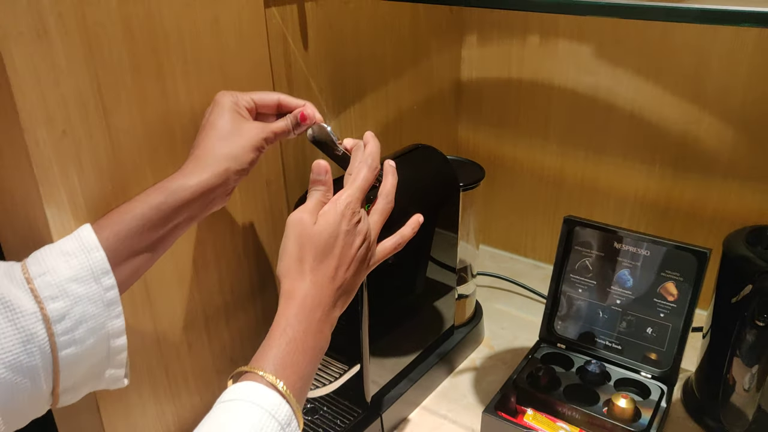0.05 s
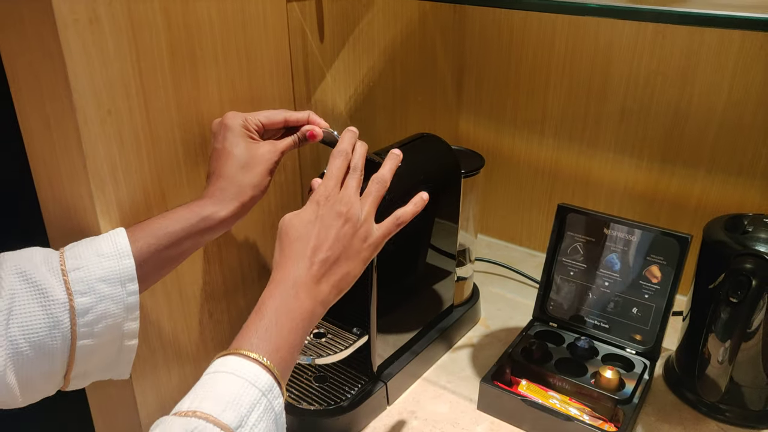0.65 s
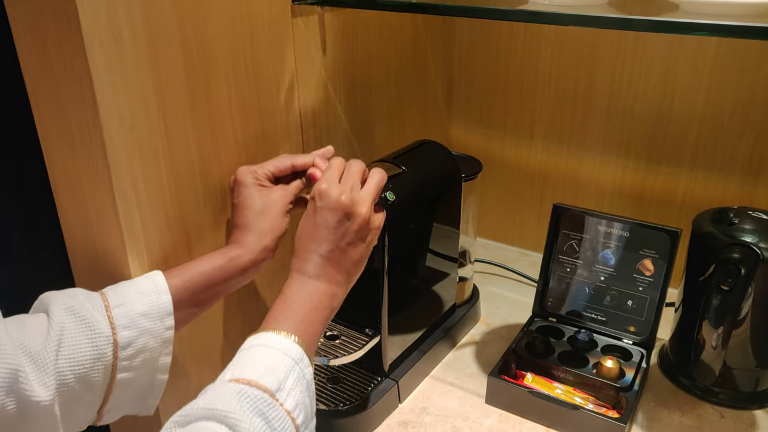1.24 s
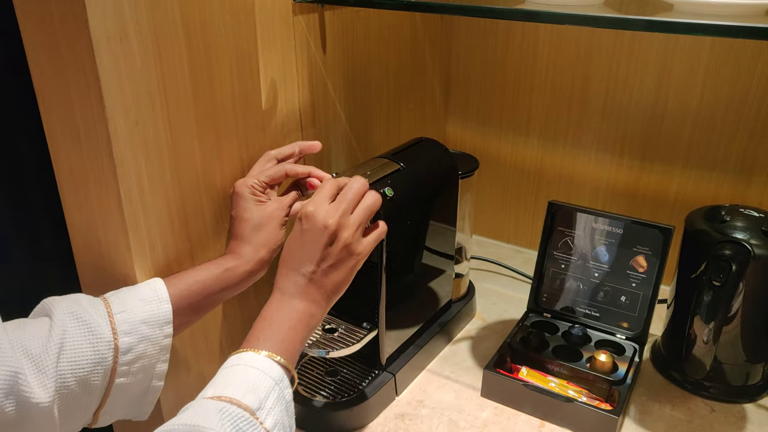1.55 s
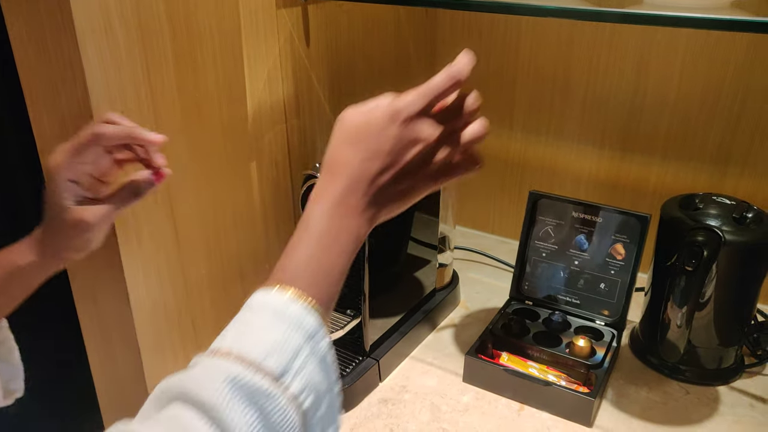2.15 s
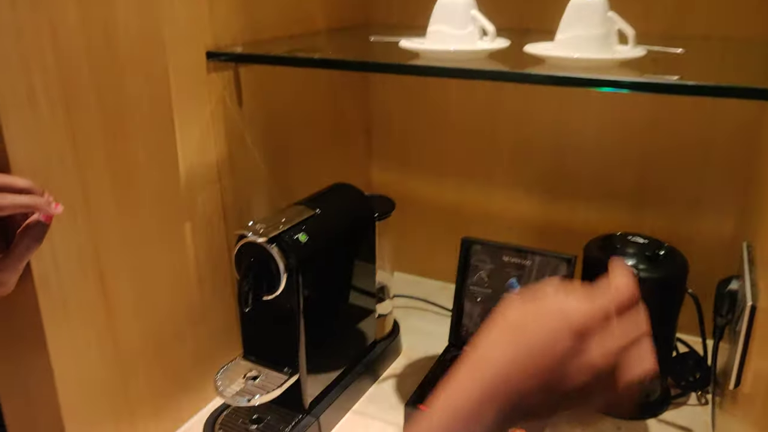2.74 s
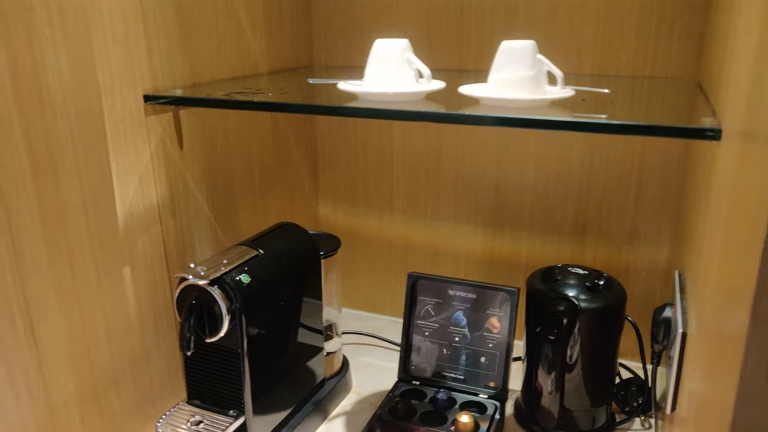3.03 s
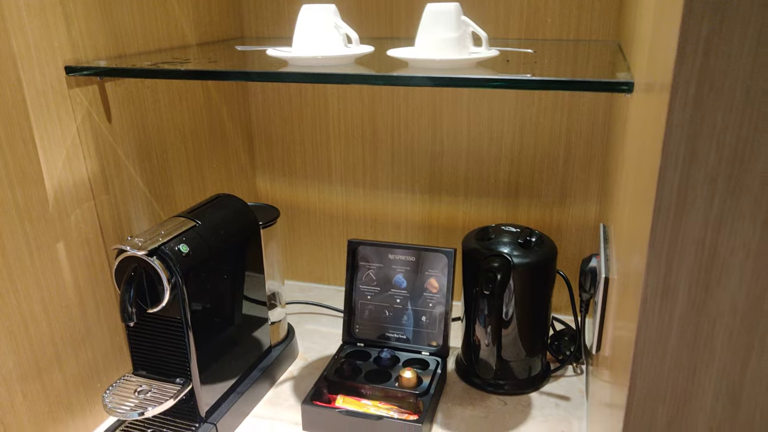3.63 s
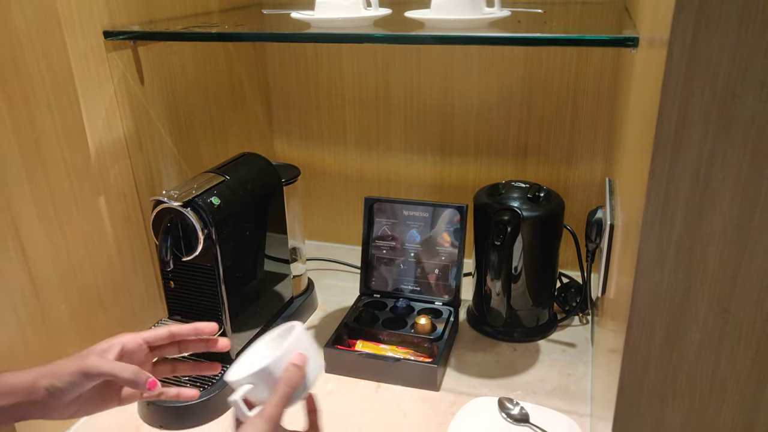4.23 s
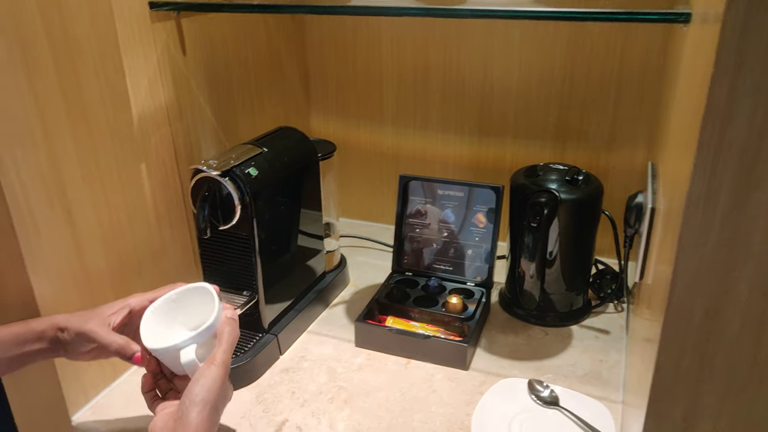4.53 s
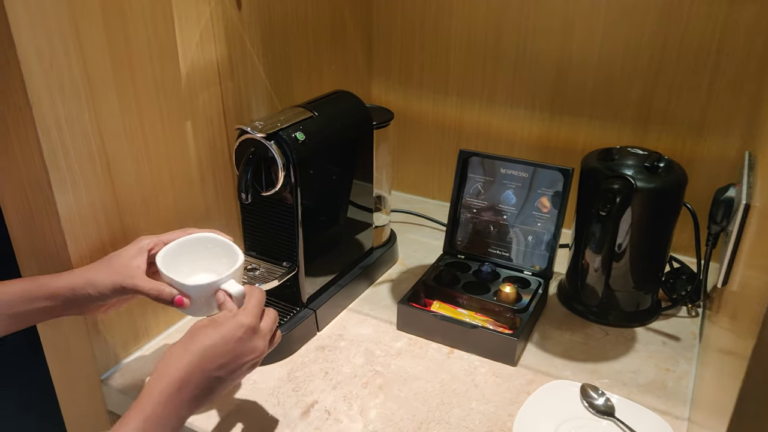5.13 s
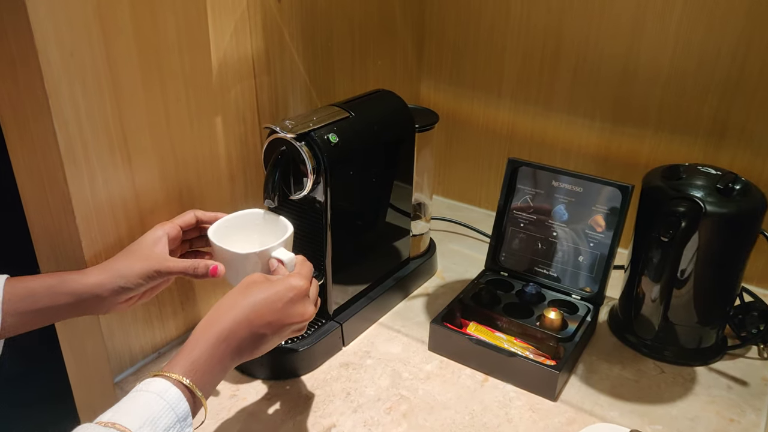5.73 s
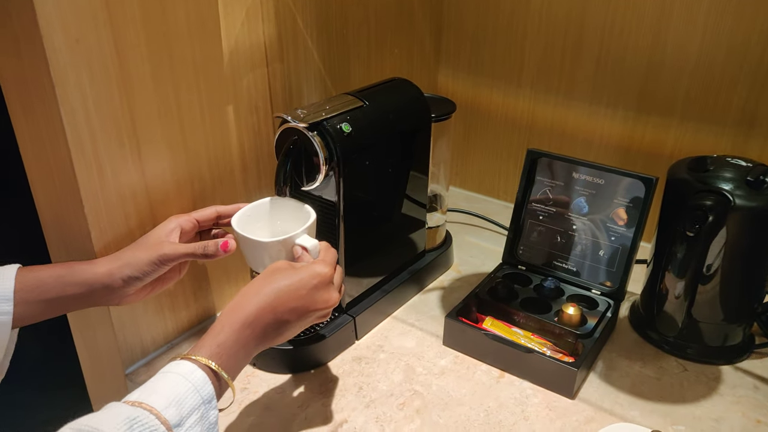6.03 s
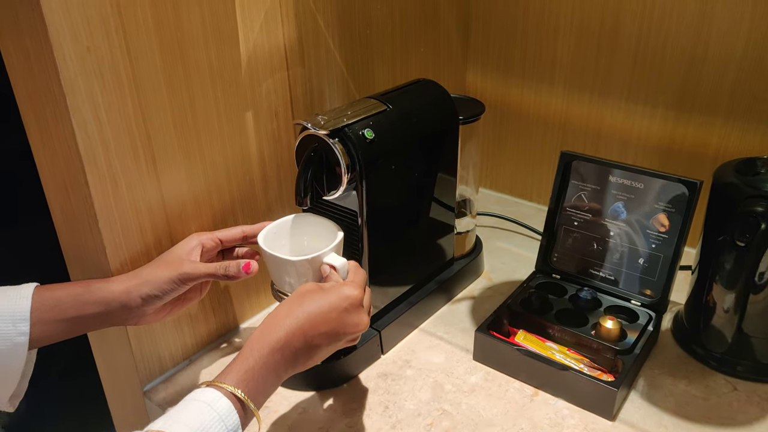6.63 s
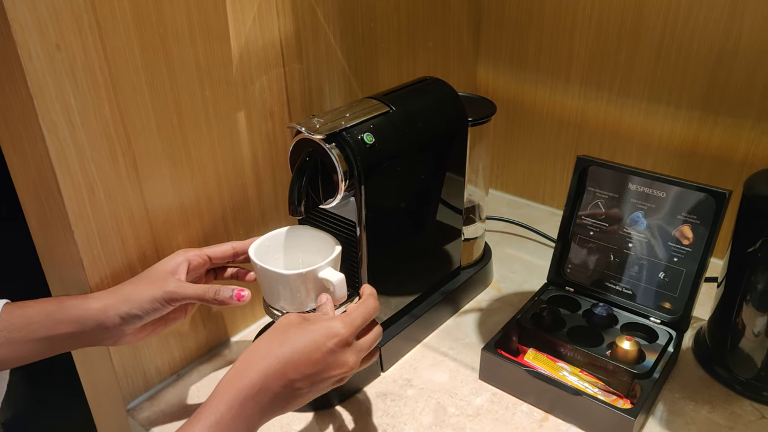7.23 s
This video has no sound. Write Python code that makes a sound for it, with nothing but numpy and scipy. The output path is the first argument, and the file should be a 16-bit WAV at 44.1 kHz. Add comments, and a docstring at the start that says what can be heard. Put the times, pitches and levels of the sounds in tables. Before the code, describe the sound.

In a quiet hotel room with rumbling, humming ventilation, a capsule coffee machine lever is thrown open with a clunk that thumps the counter. A sleeve brushes by, fingers tap, and the lever latches shut. After a pause, a china cup slides over the steel drip grid with a thin whistle, then judders, squeaks and clinks twice. A handheld phone picks it up close by.

```python
"""A capsule coffee machine in a wooden niche of a quiet hotel room, heard by a handheld phone close by.
Ventilation rumbles and hums throughout. A sleeve brushes past as the lever is thrown open with a clunk
that rocks the machine on the counter; fingers tap, and at 1.3 s the lever is pressed shut and latches.
After another brush, a china cup touches faintly at 3.7 s. From 5.9 s it slides over the steel drip
grid, rubbing and whistling thinly, then judders, squeaks and clinks at 6.6 s and 7 s."""
import sys
import numpy as np
from scipy import signal
from scipy.fft import rfft, irfft, next_fast_len
from scipy.io import wavfile
from scipy.ndimage import map_coordinates

SR = 44100
rng = np.random.default_rng(int(sys.argv[2]) if len(sys.argv) > 2 else 0)


def materialize(psi):
    """Save the field psi as 16-bit PCM at rate SR to the path in sys.argv[1].

    A 1-D psi becomes a single channel; in a 2-D psi each row is a channel.
    """
    bounded = np.clip(np.atleast_2d(psi).T, -1, 1)
    quanta = np.round(bounded * 32767).astype(np.int16)
    wavfile.write(sys.argv[1], SR, quanta)


N = 320607
SCENE_T = np.arange(N) / SR
HIT_T = np.arange(int(0.7 * SR)) / SR


def amp(db):
    """Decibels to gain."""
    return 10 ** (np.asarray(db) / 20)


def unit(x):
    """Scale to rms 1."""
    return x / np.sqrt(np.mean(x ** 2) + 1e-20)


def along(points, hz):
    """Read (Hz, value) points on a log axis."""
    knots_hz, values = np.transpose(points)
    return np.interp(np.log(hz + 1), np.log(knots_hz), values)


def fade(t, t60):
    """Free decay, 60 dB in t60."""
    return np.exp(-np.log(1000) * t / t60)


def filtered(x, response):
    """Apply a gain that depends on frequency."""
    n = x.shape[-1]
    padded = next_fast_len(n + 4096)
    return irfft(rfft(x, padded) * response(np.fft.rfftfreq(padded, 1 / SR)), padded)[..., :n]


def wobble(rate_hz):
    """A smooth random curve, rate_hz knots a second."""
    knots = rng.standard_normal(int(N * rate_hz / SR) + 4)
    return map_coordinates(knots, [SCENE_T * rate_hz])


def add(track, start_s, sound):
    """Mix a sound into a stereo track."""
    part = track[:, max(round(start_s * SR), 0):][:, :sound.shape[-1]]
    part += sound[..., :part.shape[1]]


def spread(likeness, hz):
    """Angle between mid and side that gives a left-right likeness."""
    return np.arccos(np.clip(along(likeness, hz), -1, 1)) / 2


# Sounds from the niche. Each row: frequency in Hz, left-right likeness from 0 to 1.
NEAR_LIKENESS = [(100, 0.96), (290, 0.95), (640, 0.9), (1400, 0.13), (3000, 0.046)]

def noise(n, spectrum=None, likeness=NEAR_LIKENESS):
    """Stereo noise of rms 1, alike in the bass and unrelated in the treble."""
    def response(hz):
        angle = spread(likeness, hz)
        gain = amp(along(spectrum, hz)) if spectrum else 1
        return np.array([np.cos(angle), np.sin(angle)]) * gain
    mid, side = filtered(rng.standard_normal((2, n)), response)
    return unit(np.array([mid + side, mid - side]))


# Air noise. Each row: frequency in Hz, relative density in dB.
AIR_SPECTRUM = [(20, -1.5), (45, -0.5), (80, -4), (125, -15), (170, -10), (225, -18.5), (330, -18),
                (520, -21.5), (700, -27), (2100, -31.5), (3100, -35.5), (4500, -33.5), (6200, -31.5),
                (7300, -38), (9000, -41), (10000, -47.5), (15500, -43)]
# Air noise in stereo. Each row: frequency in Hz, left-right likeness from 0 to 1.
AIR_LIKENESS = [(30, 0.7), (100, 0.92), (290, 0.73), (640, 0.38), (1400, 0)]
# Mains hum, sinking and swelling as the phone moves. Each row: time in seconds, level in dB.
HUM_LEVELS = [(0, -49), (1.5, -51), (2.4, -53), (4.5, -54.5), (7.2, -46.5)]
# Each row: frequency in Hz, level in dB, width in Hz.
FAN_TONES = [(148, -63.5, 8), (264.4, -67.5, 7)]

def ventilation(air_db=-48, drift_db=-0.23, hum_hz=100, flutter_db=4.1):
    """Steady air noise with mains hum and two unsteady fan tones."""
    def tone(hz, width_hz):
        swell = amp(flutter_db * wobble(width_hz))
        return unit(swell * np.sin(2 * np.pi * hz * SCENE_T + wobble(2 * width_hz)))
    hum = amp(np.interp(SCENE_T, *np.transpose(HUM_LEVELS))) * tone(hum_hz, width_hz=1.5)
    fan = sum(amp(db) * tone(hz, width_hz) for hz, db, width_hz in FAN_TONES)
    air = amp(air_db + drift_db * wobble(2.15)) * noise(N, AIR_SPECTRUM, AIR_LIKENESS)
    return hum + fan + air


# Each row: middle in seconds, half length in seconds, level in dB.
SLEEVE_STROKES = [(0.04, 0.021, -41), (0.445, 0.057, -57), (0.657, 0.059, -63.5), (.845, 0.047, -50),
                  (3.07, 0.099, -59)]
# Each row: frequency in Hz, relative density in dB.
CLOTH_SPECTRUM = [(800, -10.5), (3000, -13.5), (5500, -3), (6800, -7), (8800, -18.5), (10200, -44),
                  (16000, -23)]

def sleeve(grain_db=0.69):
    """Sleeve and fingers brush past: soft, slightly grainy swishes of towelling and skin."""
    strokes = sum(amp(db) * np.exp(-((SCENE_T - middle_s) / half_s) ** 2)
                  for middle_s, half_s, db in SLEEVE_STROKES)
    return strokes * amp(grain_db * wobble(86)) * noise(N, CLOTH_SPECTRUM)


def ring(modes, scatter_db):
    """Struck modes at random strengths; higher ones reach the two microphones further out of phase."""
    hz, db, t60 = np.transpose(modes)[:, :, None]
    strength, phase, skew = rng.standard_normal((3, len(modes), 1))
    gain = amp(db + scatter_db * strength)
    lead = skew * spread(NEAR_LIKENESS, hz)
    waves = np.sin(2 * np.pi * hz * HIT_T + np.pi * phase + np.array([lead, -lead]))
    return np.sum(gain * fade(HIT_T, t60) * waves, axis=1) / np.sqrt(np.sum(gain ** 2) / 2)


# Each row: frequency in Hz, t60 in seconds.
ROOM_DECAY = [(100, 0.79), (400, 0.33), (1500, 0.35), (6000, 0.31), (14000, 0.23)]

def niche(sound, walls_db, walls_t60, room_db, delay_s=0.002):
    """The wooden walls answer within milliseconds; the room adds a soft, longer tail."""
    n = len(HIT_T)
    hz, t, bands = signal.stft(noise(n), SR, nperseg=256)
    bands = bands * fade(t, along(ROOM_DECAY, hz)[:, None])
    room = signal.istft(bands, SR, nperseg=256)[1][:, :n]
    walls = noise(n) * fade(HIT_T, walls_t60)
    echoes = (amp(walls_db) * unit(walls) + amp(room_db) * unit(room)) * (HIT_T > delay_s) / np.sqrt(n)
    return sound + signal.fftconvolve(np.atleast_2d(sound), echoes, axes=1)[:, :n]


# Plastic housing. Each row: frequency in Hz, level in dB, t60 in seconds.
HOUSING_MODES = [(342.5, -11, 0.17), (398, 0, 0.12), (578.4, -5.5, 0.063), (692, -5.5, 0.1),
                 (815.7, 1.5, 0.12), (875, 2.5, 0.073), (1163, -12, 0.16), (1224, -11, 0.082),
                 (1341, -1, 0.052), (1504, -2, 0.069), (1680, -10.5, 0.073), (1884, -15.5, 0.21),
                 (1992, -18, 0.19)]
# Small loose parts. Each row: frequency in Hz, relative density in dB.
CLATTER_SPECTRUM = [(60, -33), (160, -6.5), (350, 8.5), (520, -9), (850, 1), (1450, -7), (2100, -4.5),
                    (2900, -19.5), (6000, -13), (12000, -64)]
# Hard edges meeting. Each row: frequency in Hz, relative density in dB.
CLICK_SPECTRUM = [(500, 2.5), (2000, -3), (2900, -7.5), (4200, 0), (6000, 2.5), (7300, -4.5), (8800, -12),
                  (10200, -28), (11500, -27), (13500, -21), (16000, -29)]

def contact(knock_db, centre_hz, click_db, focus_db, clatter_db=-1, clatter_t60=0.067, click_t60=0.059):
    """One contact rings the housing, shakes the loose parts and clicks, brighter the harder it is."""
    ring_db = 4 + 0.4 * knock_db  # softer knocks ring the housing less
    housing = amp(ring_db) * ring(HOUSING_MODES, scatter_db=2.5)
    clatter = amp(clatter_db) * noise(len(HIT_T), CLATTER_SPECTRUM) * fade(HIT_T, clatter_t60)
    body = housing + clatter
    # The place struck favours modes near centre_hz; an octave away they are focus_db down.
    struck = filtered(body, lambda hz: amp(-focus_db * np.log2(np.clip(hz, 150, 5000) / centre_hz) ** 2))
    knock = amp(knock_db) * unit(struck) * np.std(body) * (1 - fade(HIT_T, 0.0098))
    tilt_db_per_octave = -2 + 0.3253 * (click_db - knock_db)
    edge = noise(len(HIT_T), CLICK_SPECTRUM)
    edge = filtered(edge, lambda hz: amp(tilt_db_per_octave * np.log2(np.maximum(hz, 2000) / 6500)))
    click = amp(click_db) * edge * fade(HIT_T, click_t60) * (1 - fade(HIT_T, 0.0012))
    return niche(knock + click, walls_db=-4.5, walls_t60=0.085, room_db=-8)


# Each row: start in seconds, knock in dB, knock centre in Hz, click in dB.
LIGHT_TAPS = [(.034, -24.5, 920, -30), (.0696, -31, 900, -24), (0.342, -45.5, 350, -75),
              (.641, -39.5, 1450, -56), (0.667, -57, 1200, -47), (.739, -36, 650, -65),
              (.908, -38.5, 1420, -55), (1.073, -56, 1100, -35.5), (1.262, -39, 1150, -39.5),
              (1.272, -50, 1400, -26.5), (1.771, -47.5, 910, -46.5), (3.727, -48, 760, -56),
              (6.716, -57, 1800, -49), (6.98, -35.5, 850, -40.5), (7.032, -40.5, 750, -34.5)]

def taps():
    """Catch, fingers and cup make light single contacts with the machine."""
    track = np.zeros((2, N))
    for start_s, knock_db, centre_hz, click_db in LIGHT_TAPS:
        add(track, start_s, contact(knock_db, centre_hz, click_db, focus_db=8.5))
    return track


# Lever thrown open, then pressed shut. Each row: start in seconds, knock in dB, knock centre in Hz,
# click in dB, counter thump in dB, rattle decay in dB per second.
LEVER_CLUNKS = [(.0527, -19, 750, -21.5, -9.5, 480), (1.324, -31, 1500, -29.5, -26, 70)]

def lever(seat_s=0.007, rattles=4, gap_s=0.013):
    """The lever strikes its stop, seats with a heavier, duller knock and leaves loose parts rattling."""
    track = np.zeros((2, N))
    for start_s, knock_db, centre_hz, click_db, _, decay_db_per_s in LEVER_CLUNKS:
        stop = contact(knock_db, centre_hz, click_db, focus_db=1)
        seat = contact(knock_db + 3.5, centre_hz, click_db - 3, focus_db=1)
        add(track, start_s, stop)
        add(track, start_s + seat_s, seat)
        for delay_s in seat_s + gap_s * (1 + np.arange(rattles) + 0.2 * rng.standard_normal(rattles)):
            lost_db = decay_db_per_s * delay_s
            rattle = contact(knock_db - 6 - lost_db, centre_hz, click_db - 21 - lost_db, focus_db=1)
            add(track, start_s + delay_s, rattle)
    return track


# Machine rocking on the counter. Each row: frequency in Hz, level in dB, t60 in seconds.
COUNTER_MODES = [(85, -2, .16), (126.3, -1, .095), (251, -8, 0.08)]

def counter(attack_s=0.025):
    """At each clunk the machine's weight bounces on the counter top, and the cabinet booms after it."""
    track = np.zeros((2, N))
    modes = sum(amp(db) * np.sin(2 * np.pi * hz * HIT_T) * fade(HIT_T, t60)
                for hz, db, t60 in COUNTER_MODES)
    bounce = modes * (1 - fade(HIT_T, attack_s))
    for start_s, _, _, _, thump_db, _ in LEVER_CLUNKS:
        add(track, start_s, niche(amp(thump_db) * bounce, walls_db=-27, walls_t60=0.065, room_db=-12.5))
    return track


# Each row: start in seconds, length in seconds, squeak in Hz, squeak in dB, ring in dB,
# left minus right in dB.
CUP_SLIPS = [(3.73, .005, 3960, -57, -70, 0), (6.551, 0.013, 4727, -28.5, -35.5, 6.5),
             (6.559, 0.015, 4323, -32.5, -46.5, 12), (7.019, 0.0068, 4390, -34, -70, 12),
             (7.032, 0.0033, 4960, -20.5, -55, 1), (7.038, 0.0021, 8060, -34, -65, -20)]
# Each row: frequency in Hz, level in dB, t60 in seconds.
CHINA_MODES = [(2296, -8, 0.23), (3924, -8, 0.5), (4075, -6, 0.18), (4312, 1.5, .09), (4746, 5, 0.13),
               (4820, -19, 0.11), (5700, -22, 0.42), (6400, -17, 0.43), (6812, -26, .28),
               (7149, -19.5, 0.86), (8240, -27, .14), (8730, -12, 0.2), (14300, -22, .15)]

def cup_slips(attack_s=0.0067):
    """The cup sticks and slips; each slip is a squeak of milliseconds that leaves the china ringing."""
    track = np.zeros((2, N))
    for start_s, length_s, hz, squeak_db, ring_db, pan_db in CUP_SLIPS:
        swell = np.sin(np.pi * np.minimum(HIT_T / length_s, 1))
        squeak = amp(squeak_db) * swell * np.sin(2 * np.pi * hz * HIT_T)
        china = amp(ring_db) * ring(CHINA_MODES, scatter_db=1) * (1 - fade(HIT_T, attack_s))
        slip = niche(squeak + china, walls_db=1, walls_t60=0.078, room_db=-10.5)
        add(track, start_s, slip * amp([[pan_db / 2], [-pan_db / 2]]))
    return track


# Cup crossing the grid's fine grain. Each row: time in seconds, ridge rate in Hz.
SLIDE_SPEEDS = [(5.92, 2360), (6.0, 2560), (6.06, 3000), (6.12, 3700), (6.2, 3380), (6.35, 2950),
                (6.4, 3020), (6.47, 2750), (6.62, 2460), (6.73, 2760), (6.85, 2400)]
# Each row: multiple of the ridge rate, level in dB.
WHISTLE_PARTIALS = [(4, -1), (5, 1.5)]
# Each row: centre in Hz, width in Hz, level in dB.
TRAY_RESONANCES = [(920, 130, 2.5), (2260, 220, 2.5), (5540, 2100, -3.5)]

def cup_slide(middle_hz=2900, fade_s=0.1, flutter_db=4.2):
    """Sliding china rubs the tray's resonances and whistles thinly, higher and louder with speed."""
    def tray(hz):
        return sum(amp(db) / (1 + ((hz - centre_hz) * 2 / width_hz) ** 2)
                   for centre_hz, width_hz, db in TRAY_RESONANCES)
    times_s, rates_hz = np.transpose(SLIDE_SPEEDS)
    ridge_hz = np.interp(SCENE_T, times_s, rates_hz)
    phase = 2 * np.pi * np.cumsum(ridge_hz) / SR
    whistle = sum(amp(db + flutter_db * wobble(23)) * np.sin(multiple * phase + 0.8 * wobble(300))
                  for multiple, db in WHISTLE_PARTIALS)
    # So small a contact radiates its highest partials best.
    whistle = filtered(whistle, lambda hz: amp(20 * np.log2(np.clip(hz, 5000, 14000) / 14000)))
    rub = unit(filtered(noise(N), tray))
    doublings = np.log2(ridge_hz / middle_hz)
    whistle_db, rub_db = -75 + 12 * doublings, -64.5 + 19 * doublings
    touch = np.clip(np.minimum(SCENE_T - times_s[0], times_s[-1] - SCENE_T) / fade_s, 0, 1)
    return touch * (amp(whistle_db) * ports(whistle) + amp(rub_db) * rub)


# Each row: start in seconds, length in seconds, knock in dB, click in dB.
GRID_SCRAPES = [(6.554, .02, -37, -42), (6.995, .07, -38.5, -45.5)]

def cup_judder(max_catches=8, gap_s=0.0135, grid_hz=800):
    """The pushed cup catches on the drip grid again and again, at slightly uneven intervals."""
    track = np.zeros((2, N))
    for start_s, length_s, knock_db, click_db in GRID_SCRAPES:
        gaps_s = gap_s * np.exp(0.12 * rng.standard_normal(max_catches))
        delays_s = np.cumsum(gaps_s) - gaps_s
        for delay_s in delays_s[delays_s < length_s]:
            add(track, start_s + delay_s, contact(knock_db, grid_hz, click_db, focus_db=3.5))
    return track


# Each row: frequency in Hz, left minus right in dB.
PORT_BALANCE = [(100, -2), (400, 2.5), (2000, 3.5), (3400, 1.5), (5600, 2.5), (6900, 6), (8200, -18),
                (9300, -21), (11000, -10), (15000, -12)]

def ports(sound):
    """The two microphone ports colour near sounds differently."""
    return filtered(sound, lambda hz: amp(along(PORT_BALANCE, hz) * np.array([[0.5], [-0.5]])))


def scene():
    """Near sounds from the niche over the room's ventilation."""
    background = ventilation() * amp([[0.4], [-0.4]])
    near = counter() + cup_slips() + cup_slide() + ports(sleeve() + taps() + lever() + cup_judder())
    return background + near


def record(dry, top_hz=15800):
    """The phone keeps nothing above its band limit."""
    return filtered(dry, lambda hz: hz < top_hz)


dry = scene()
out = record(dry)
materialize(out)
```